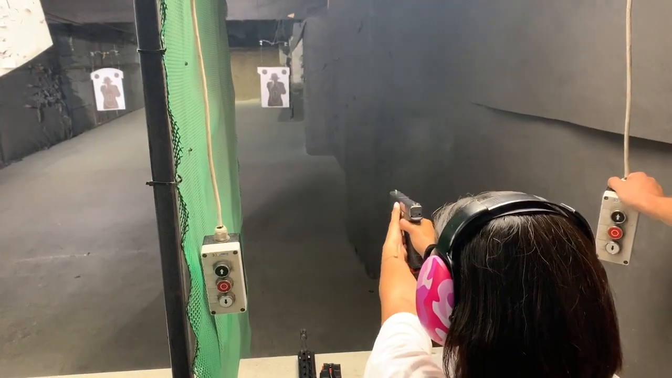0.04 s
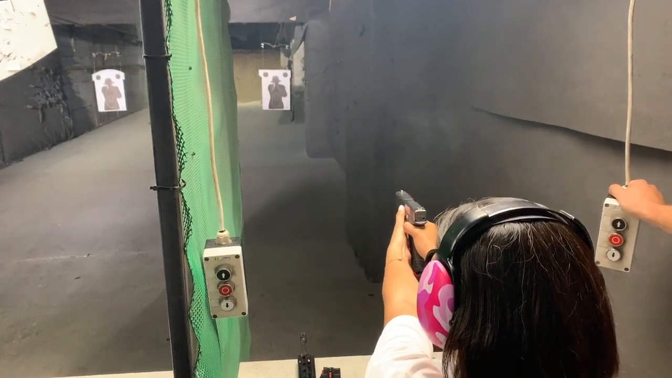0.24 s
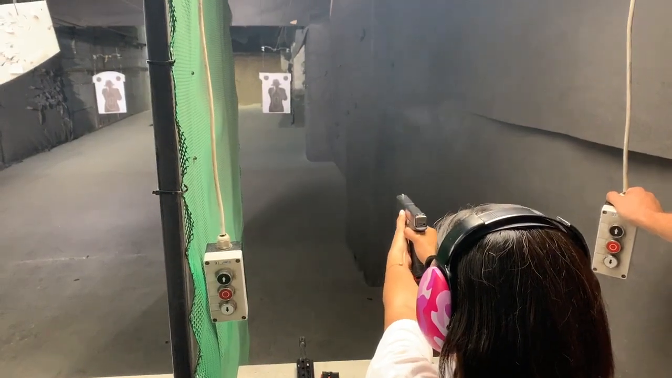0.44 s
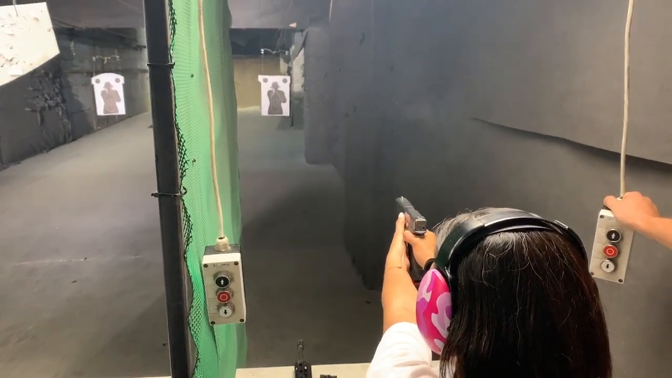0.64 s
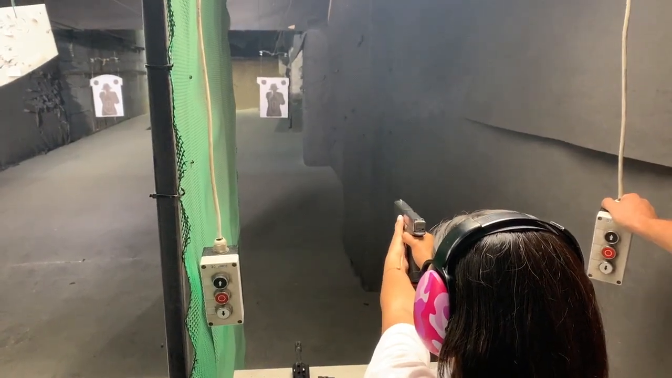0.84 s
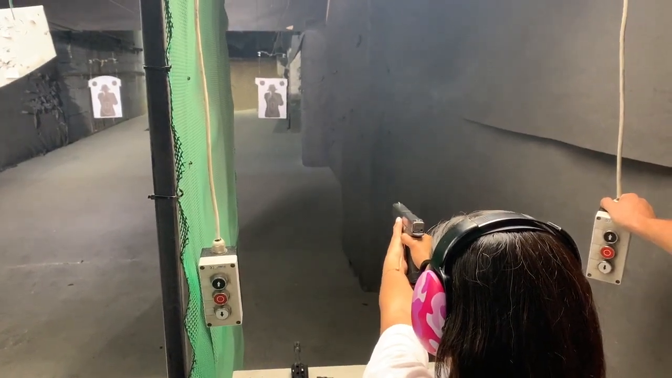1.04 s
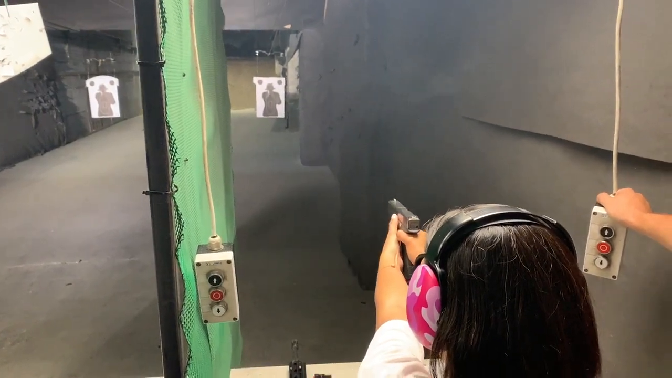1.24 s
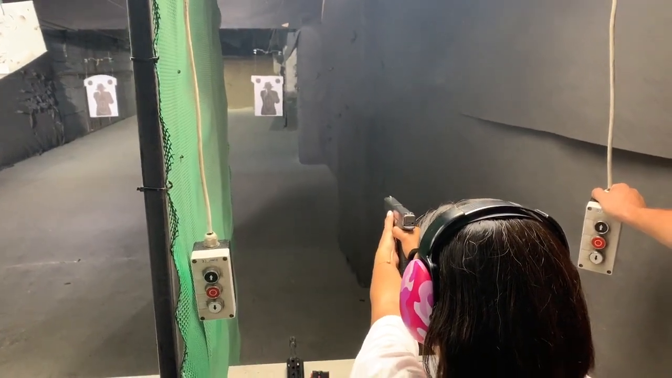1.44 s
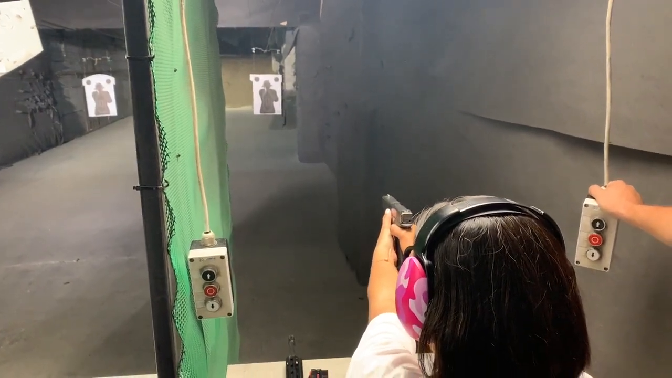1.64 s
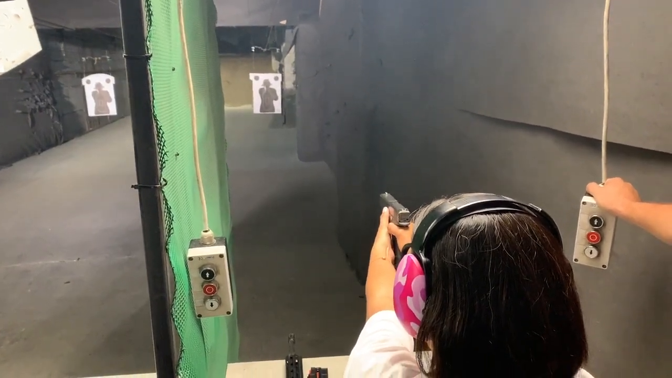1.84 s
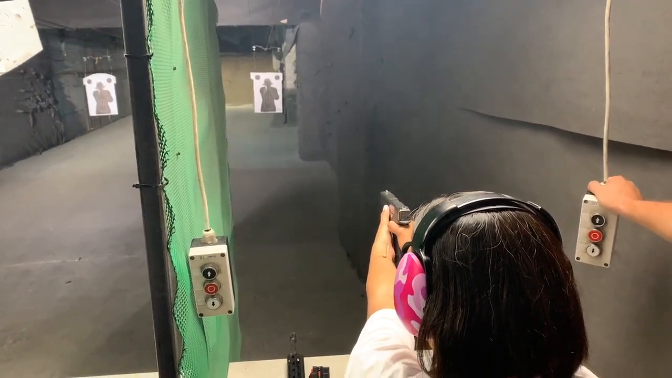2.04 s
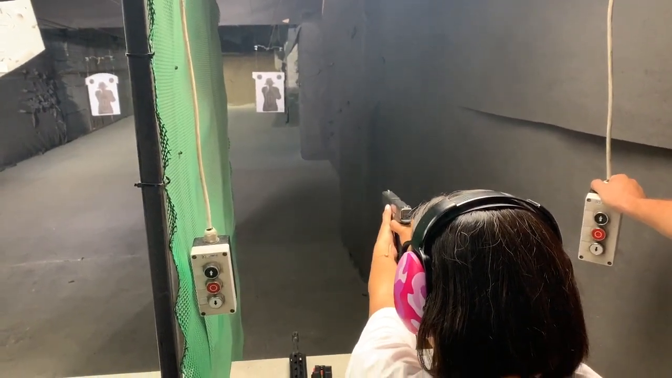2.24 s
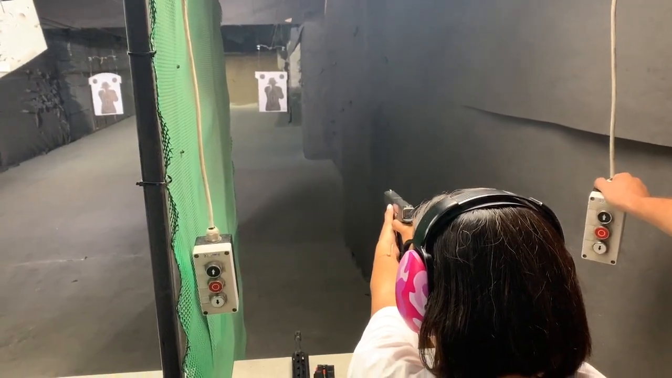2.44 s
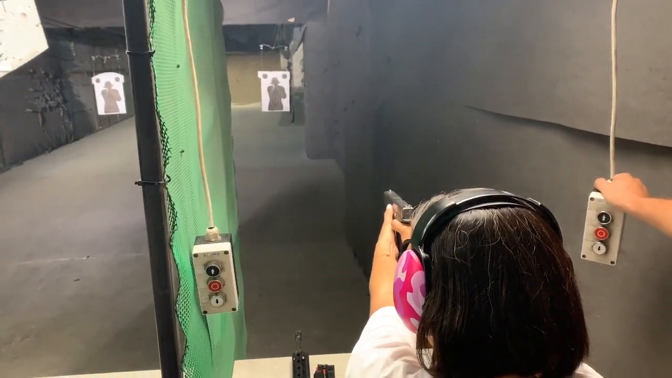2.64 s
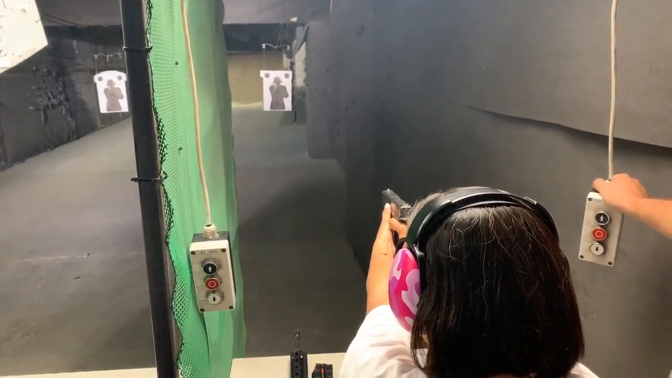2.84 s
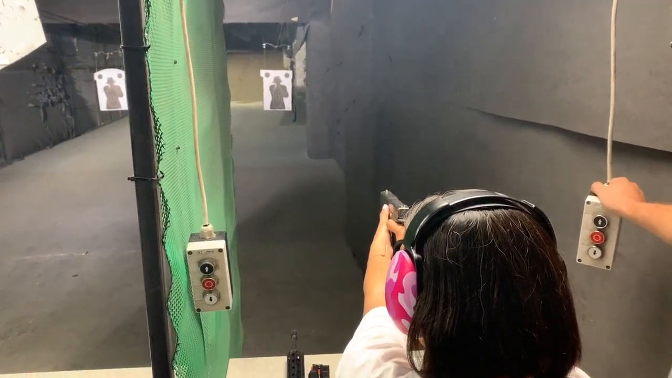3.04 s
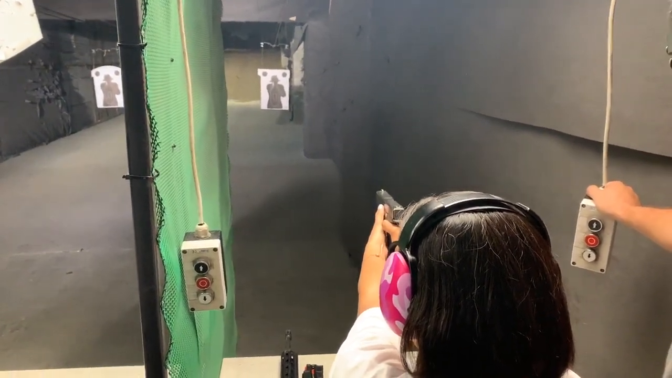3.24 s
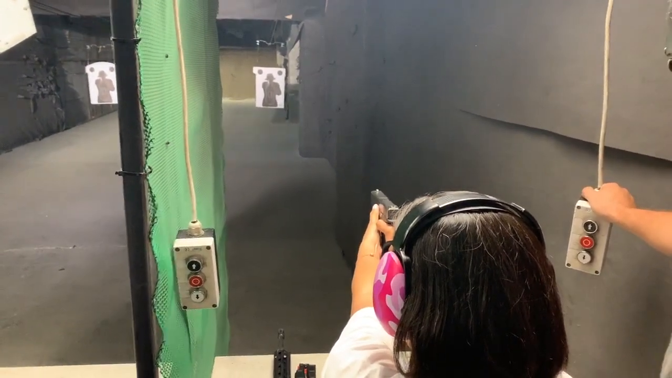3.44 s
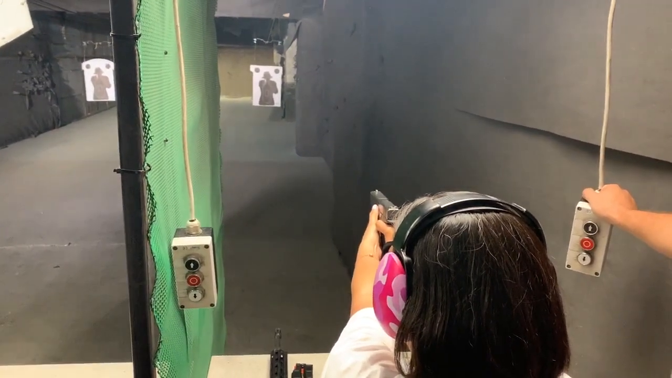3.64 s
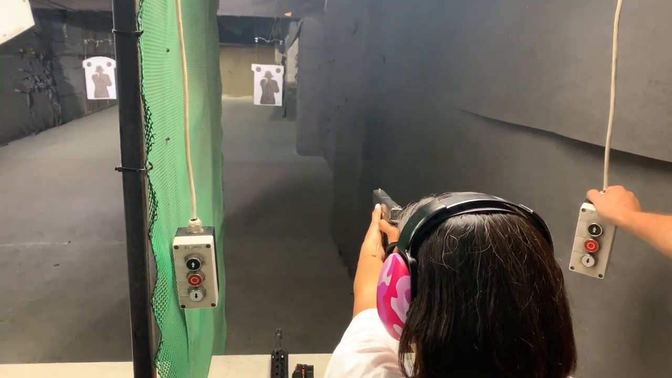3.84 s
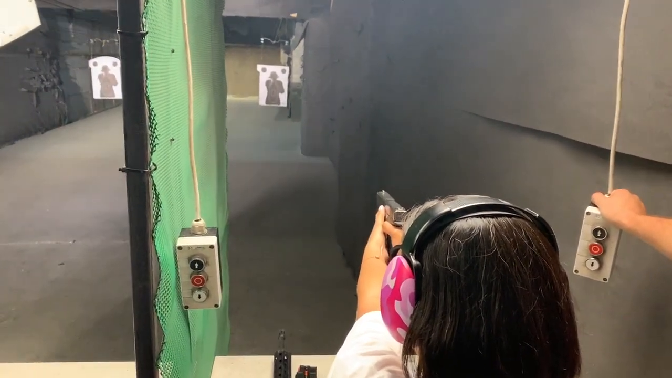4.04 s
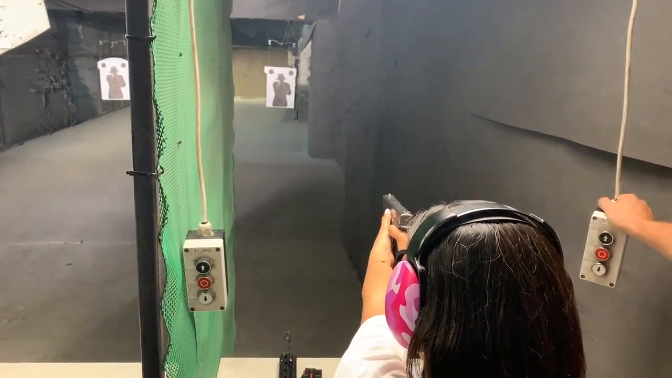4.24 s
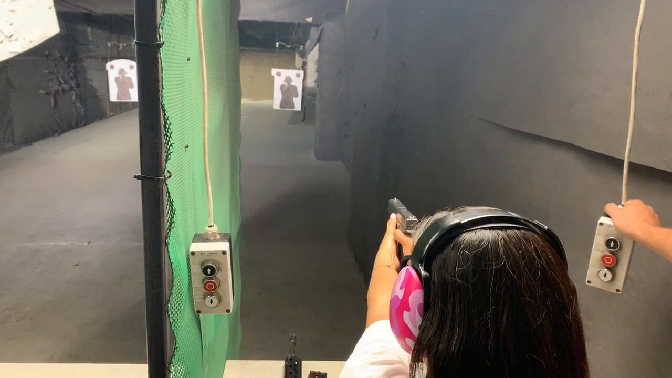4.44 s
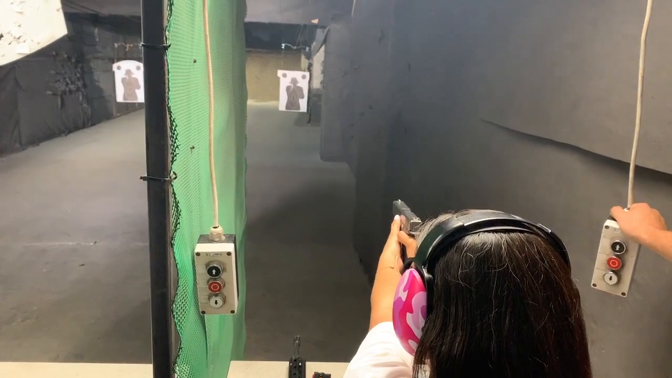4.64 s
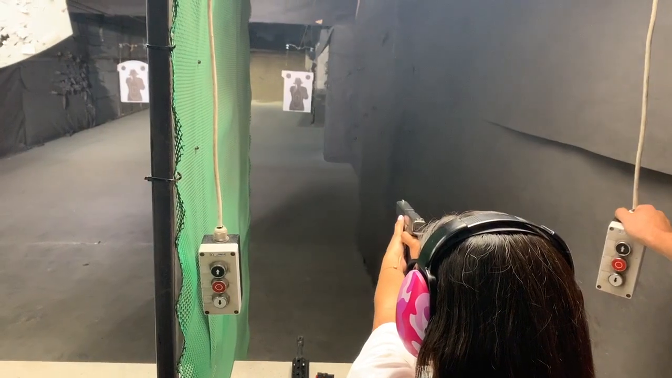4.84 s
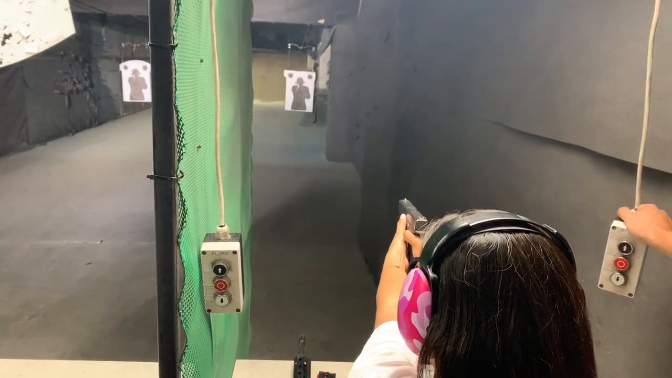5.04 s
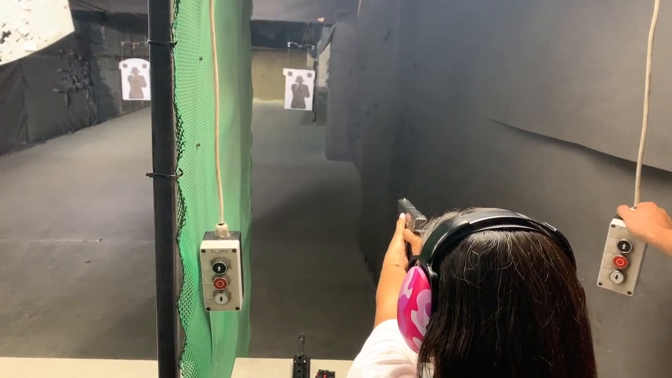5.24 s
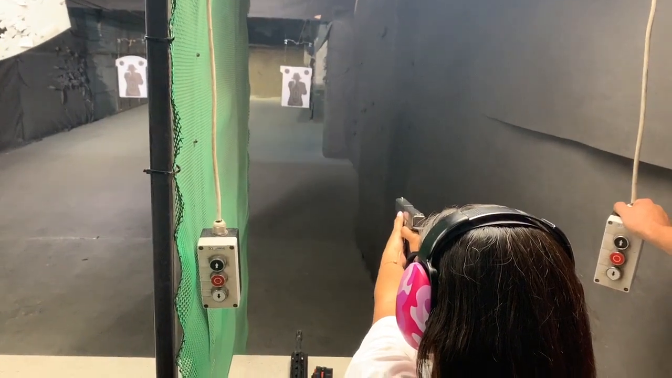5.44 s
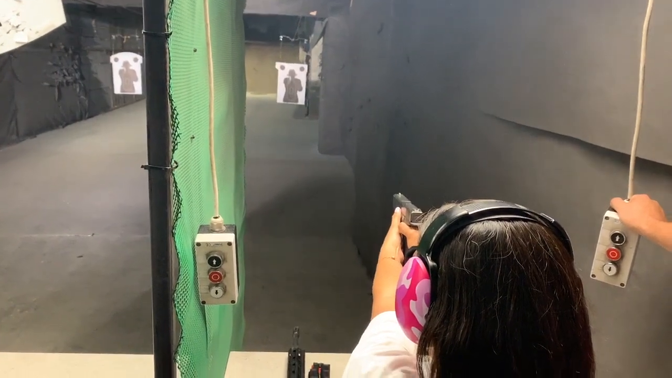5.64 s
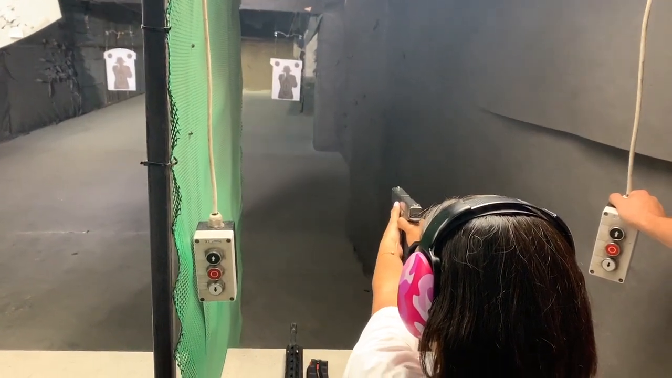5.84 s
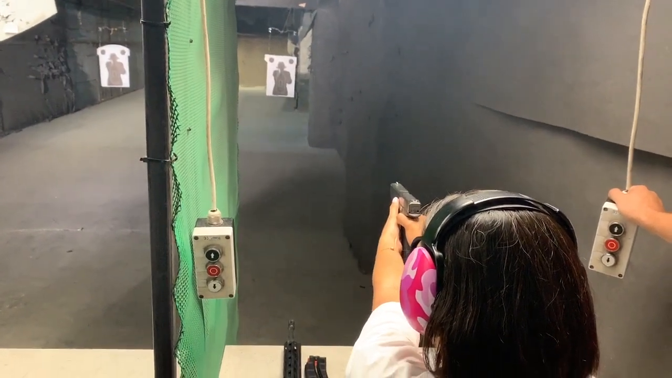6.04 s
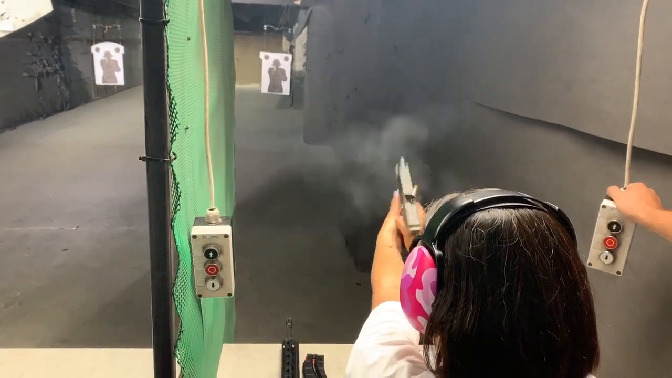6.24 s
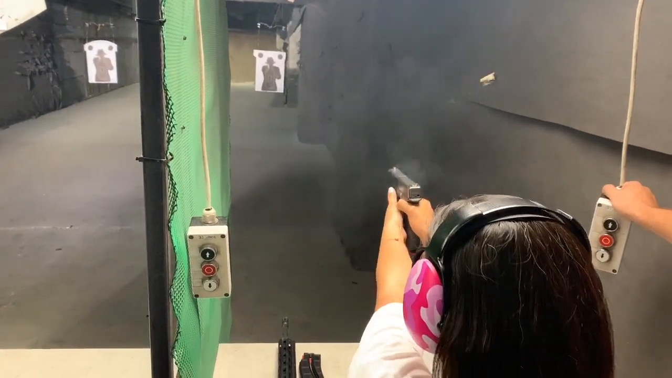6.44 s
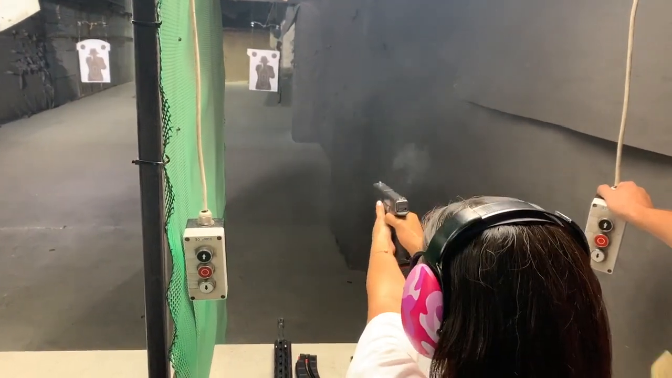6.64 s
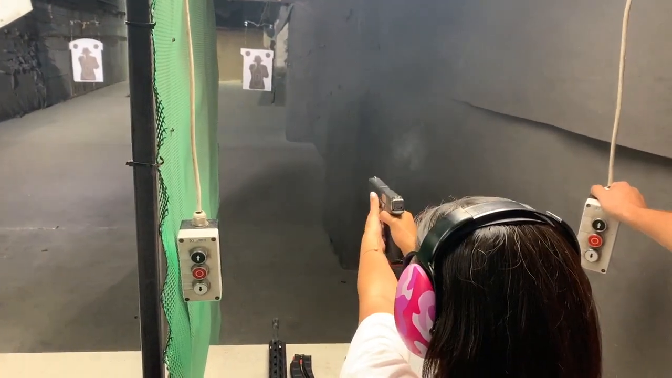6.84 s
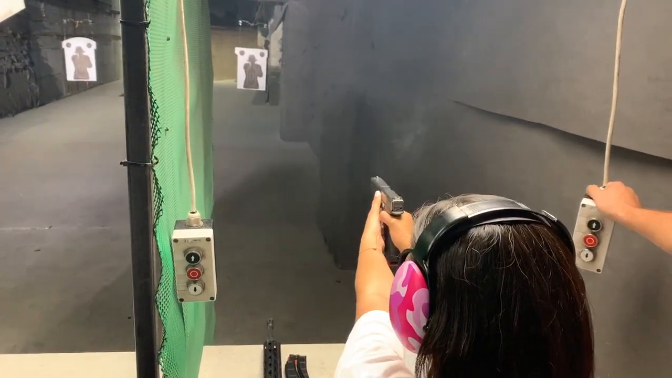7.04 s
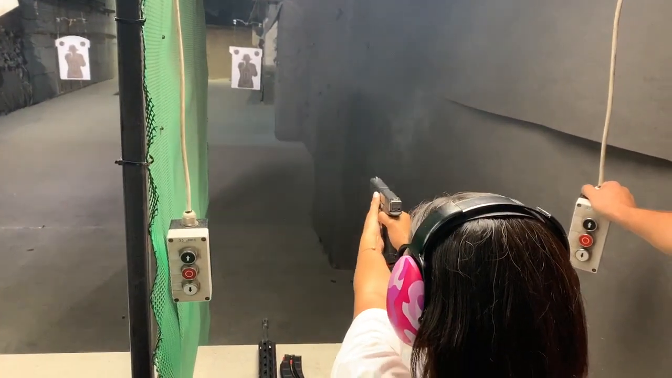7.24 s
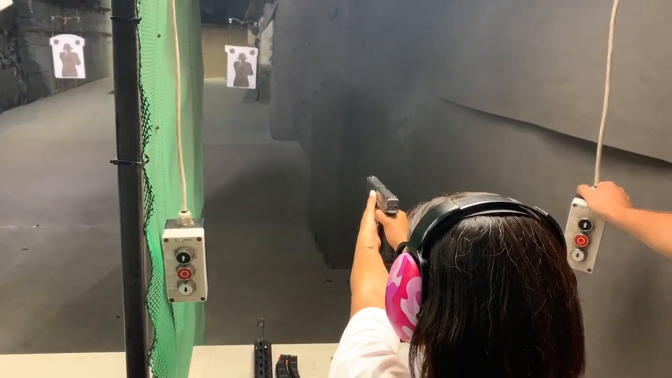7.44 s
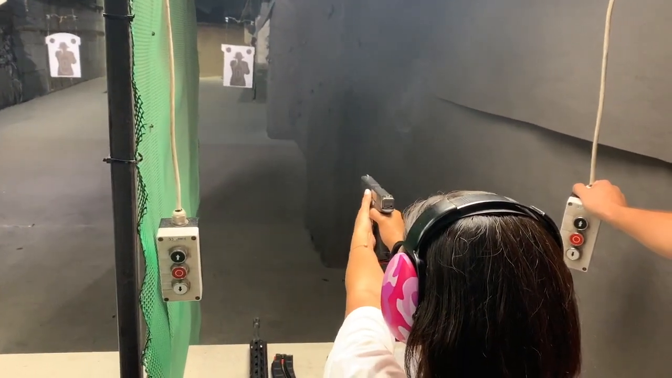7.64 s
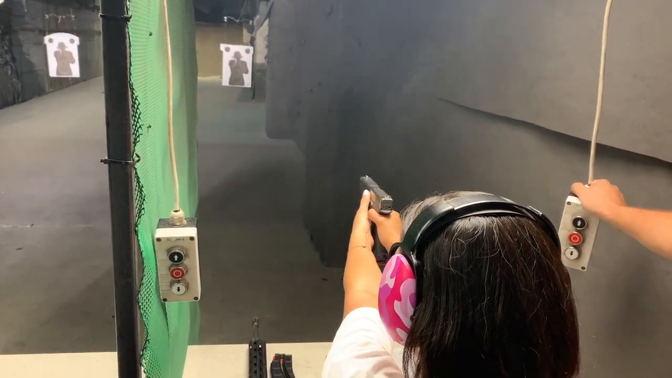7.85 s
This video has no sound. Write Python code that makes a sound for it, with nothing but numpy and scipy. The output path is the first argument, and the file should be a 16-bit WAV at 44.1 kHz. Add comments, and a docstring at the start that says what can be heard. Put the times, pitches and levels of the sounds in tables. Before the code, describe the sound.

Two pistols fire three booming shots in a concrete indoor range, while casings clink faintly over humming ventilation.

```python
"""Two pistols at an indoor range

Two pistols fire single shots from neighbouring booths, close to a stereo microphone. Each blast
rattles round the booth, overloads the microphone, rolls down the concrete lane and comes back from
its far end. Spent brass cases bounce and ring, something clacks once, and the ventilation hums on."""
import sys
import numpy as np
from scipy import signal
from scipy.fft import irfft, next_fast_len
from scipy.io import wavfile

SR = 44100
rng = np.random.default_rng(int(sys.argv[2]) if len(sys.argv) > 2 else 0)


def persist_wave(psi):
    """Save psi, clipped to +-1, as 16-bit WAV."""
    counts = np.round(np.clip(psi, -1, 1) * 32767).astype(np.int16)
    wavfile.write(sys.argv[1], SR, np.atleast_2d(counts).T)


N = 348831

# How alike the microphone's left and right sides sound: f/Hz, likeness from 0 to 1
LIKENESS = [(100, 1), (300, 0.83), (1000, 0.36), (2300, 0.5), (3600, 0), (4900, 0.96), (6500, 0.7),
            (8000, 1), (15000, 0.9)]
# How much louder the left side is: f/Hz, level/dB
BALANCE = [(60, -0.5), (350, -1.37), (800, -2.5), (1500, -1.4), (3000, -0.5)]

# A "colour" says how strong a noise is at each frequency, compared with the others.
# Colours of the ventilation: f/Hz, level/dB
VENT_RUMBLE = [(15, -34), (45, -13.5), (80, -14.5), (112, -2), (165, -10.5), (220, -5.5), (245, -4),
               (330, -11.5), (370, -15.5), (480, -22), (750, -22), (980, -33.5), (1160, -20)]
VENT_HISS = [(1300, -27), (1650, -25), (2100, -31.5), (2700, -39.5), (4500, -36.5), (6000, -46.5),
             (8000, -50), (10000, -62.5), (16000, -68)]
# Faint fan tones: f/Hz, level/dB
FAN_TONES = [(530, -80.5), (737, -80.5), (922, -84)]
# The two notes the ducts drone on: f/Hz, width/Hz, relative level/dB
DUCT_NOTES = [(273, 5, -5), (313.6, 13, -1)]
# How the drone swells and sinks: t/s, level/dB
DRONE_SWELL = [(.9, -56.5), (1.25, -49), (1.6, -53.5), (1.9, -50), (3.6, -52), (4.6, -56), (5.2, -51),
               (5.7, -53), (7.7, -50.5), (7.9, -61)]

# A dry clack and its rebound: t/s, level/dB, rise and fall/s
CLACK_HITS = [(0.7162, -35, 0.0033), (.738, -44, .0015)]
# Colour of the clack: f/Hz, level/dB
CLACK_COLOUR = [(300, -27), (600, -17), (1100, -2.5), (1600, 6.5), (2100, -3.5), (2700, -5), (3400, -13),
                (4400, -8), (6000, -13.5), (9000, -26), (15000, -41)]
# A "mode" is a note that something rings at; "t60" is the time a sound takes to fade by 60 dB.
# Modes of the hollow body that clacks: f/Hz, level/dB, t60/s
CLACK_MODES = [(1020, -10, 0.23), (1510, -12.5, .05), (2040, -2, 0.054), (4300, -10, .03)]

# Bounces of the brass cases: t/s, tick level/dB, scatter level/dB, ring f/Hz, ring level/dB
BOUNCES = [(0.362, -42.5, -72, 10550, -47), (2.746, -45, -25.5, 7400, -54),
           (3.2885, -51, -58.5, 7440, -41.5), (3.633, -56, -75, 7470, -49.5), (3.79, -64, -79, 7470, -61),
           (7.1615, -41, -58, 10900, -41), (7.4243, -47, -50, 7470, -43.5), (7.579, -63, -78, 10840, -42)]
# Colours of a bounce's tick and of its scatter from the walls: f/Hz, level/dB
TICK_COLOUR = [(1500, -26), (2900, -18), (4250, 12), (6000, -5), (11000, -12), (12800, -2), (15000, -1),
               (16000, -12)]
SCATTER_COLOUR = [(1500, -19), (3500, -14.5), (5100, -11), (6000, -1.5), (9000, -6.5), (11300, -2.5),
                  (12500, -14), (13600, -15), (15000, -16), (16000, -8)]
# Modes of a case: multiple of its ring frequency, level/dB, share of its t60
CASE_MODES = [(1, -5, 1), (1.553, -23, 0.41), (2.01, -18, .4)]
# Modes of a metal fitting that one case strikes: f/Hz, level/dB, t60/s
FITTING_MODES = [(4180, -46, 0.43), (5884, -32, 0.28), (6060, -37, 0.5), (6160, -37, 0.27),
                 (6702, -49, 0.58), (9572, -32, 0.12), (14970, -36, 0.17)]

# Colours of the booth's quick echoes and the lane's long ones: f/Hz, level/dB
BOOTH_COLOUR = [(20, -27), (60, -6.5), (200, 0.5), (500, -1.5), (1300, 1.5), (2000, -3.5), (2800, -14),
                (4400, -11.5), (7000, -16.5), (10000, -19.5), (13000, -29.5), (16000, -27)]
LANE_COLOUR = [(20, -23.5), (45, -13.5), (65, -5), (100, -1), (240, -2.5), (450, 1), (1200, 0),
               (1900, -2.5), (2600, -10), (3600, -16), (5500, -15), (8000, -20), (11000, -25),
               (15000, -32.5)]
# How long those echoes last: f/Hz, t60/s
BOOTH_T60 = [(100, .45), (700, 0.49), (2000, 0.39), (6000, 0.46), (15000, 0.17)]
LANE_T60 = [(60, 1.9), (150, 1.6), (400, 1.327), (1200, 1.211), (2500, 1.082), (5000, .92), (8000, 0.73),
            (15000, .5)]
# The lane's deepest modes (standing waves): f/Hz, level/dB, t60/s
BOOM_MODES = [(62, -32.5, 3.5), (130.6, -36, 3)]
# Colours of the blast's low push, the muzzle crack and its bright first echoes: f/Hz, level/dB
THUMP_COLOUR = [(15, -16), (35, -4.5), (60, 0.5), (100, -3.5), (200, -20.5), (600, -57.5)]
CRACK_COLOUR = [(30, -14.5), (150, -4), (1500, 1), (3500, -3.5), (8000, -9.5), (11000, -11.5),
                (16000, -13.5)]
RASP_COLOUR = [(500, -10), (3000, -0.5), (7000, -1.5), (11000, 0.5), (16000, -7)]
# The shots (the first is already fading at the start): t/s, booth, crack level/dB, room level/dB
SHOTS = [(-.53, "own", 11.5, -1), (2.171, "next", 5, 0.5), (6.2163, "own", 9, 0.96),
         (6.611, "next", 8, -0.4)]


def gain_of(db):
    """Turns decibels into a number to multiply by."""
    return 10 ** (np.asarray(db) / 20)


def evened(x):
    """Scales a sound to an average (rms) strength of 1."""
    return x / np.sqrt(np.mean(x ** 2) + 1e-20)


def bell(x, centre, width):
    """A smooth hump of height 1."""
    return np.exp(-.5 * ((x - centre) / width) ** 2)


def read(table, hz):
    """Reads between the rows of a table, with every octave equally wide."""
    f, value = np.transpose(table)
    return np.interp(np.log(hz + 1), np.log(f + 1), value)


def add(mix, s, sound):
    """Mixes a stereo sound in at s seconds, which may lie before the start."""
    start = round(s * SR)
    sound = sound[:, max(-start, 0):]
    part = mix[:, max(start, 0):][:, :sound.shape[1]]
    part += sound[:, :part.shape[1]]


def left_lead(hz, bass_path_m=-.043, treble_path_m=.0447, changeover_hz=1690):
    """How far the left side is ahead, in radians: bass reaches the right first, treble the left."""
    treble_share = hz ** 2 / (hz ** 2 + changeover_hz ** 2)
    extra_path_m = bass_path_m + (treble_path_m - bass_path_m) * treble_share
    skew = 1.3 * bell(hz, centre=3100, width=330)  # one narrow band is further out of step
    return 2 * np.pi * hz * extra_path_m / 343 + skew  # sound travels at 343 m/s


def noise(colour, size):
    """Coloured noise of strength 1, partly alike on the left and right."""
    hz = np.fft.rfftfreq(size, 1 / SR)
    a, b, c, d = rng.standard_normal((4, len(hz)))
    likeness = np.clip(read(LIKENESS, hz), 0, 1)
    left = a + 1j * b
    right = likeness * left + np.sqrt(1 - likeness ** 2) * (c + 1j * d)
    right = right * np.exp(-1j * left_lead(hz)) / gain_of(read(BALANCE, hz))
    return evened(irfft(np.array([left, right]) * gain_of(read(colour, hz)), size))


def reverb(colour, t60_table, size):
    """Countless echoes blur into noise in which each band fades at its own speed."""
    hz, t, bands = signal.stft(noise(colour, size), SR, nperseg=512)
    fade = gain_of(-60 * t / read(t60_table, hz)[:, None])
    return signal.istft(bands * fade, SR, nperseg=512)[1][:, :size]


def waver(rate_hz, size):
    """A random wobble in strength and phase, as complex numbers of average (rms) size 1."""
    hz = np.fft.fftfreq(size, 1 / SR)
    wobble = np.fft.ifft(np.exp(2j * np.pi * rng.random(size)) * bell(hz, 0, rate_hz))
    return wobble / np.sqrt(np.mean(abs(wobble) ** 2))


def ring(modes, flutter, flutter_hz, size):
    """Fading notes; reflections make each one flutter."""
    t, out = np.arange(size) / SR, np.zeros((2, size))
    for hz, db, t60 in modes:
        direct = np.exp(-1j * np.array([[0], [left_lead(hz)]]))
        reflected = flutter * np.array([waver(flutter_hz, size) for _ in range(2)])
        tone = ((direct + reflected) * np.exp(2j * np.pi * hz * t)).imag
        out += gain_of(db - 60 * t / t60) * tone
    return out / np.sqrt(1 + flutter ** 2)


def ventilation(air_db=-56, waver_hz=6):
    """Air rumbles and hisses in the ducts, with a few unsteady fan tones."""
    size = next_fast_len(N)
    t, fan = np.arange(size) / SR, np.zeros(size)
    for hz, db in FAN_TONES:
        tone = (waver(waver_hz, size) * np.exp(2j * np.pi * hz * t)).real
        fan += gain_of(db) * np.sqrt(2) * tone
    air = gain_of(air_db) * noise(VENT_RUMBLE + VENT_HISS, size)
    return (air + fan)[:, :N]


def duct_drone(trim_db=-1):
    """The ducts resonate on two low notes that slowly swell and sink."""
    t = np.arange(N) / SR
    notes = sum(gain_of(db) * waver(width, next_fast_len(N))[:N] * np.exp(2j * np.pi * hz * t)
                for hz, width, db in DUCT_NOTES)
    low_hz = DUCT_NOTES[0][0]
    sides = np.array([[1], [np.exp(-1j * left_lead(low_hz)) / gain_of(read(BALANCE, low_hz))]])
    swell_db = np.interp(t, *np.transpose(DRONE_SWELL))
    return gain_of(trim_db + swell_db) * evened((sides * notes).real)


def clack(echo_db=-16, echo_t60=0.68, run_up_s=.5):
    """Something slides and snaps home; its hollow body rings and the room echoes."""
    out, t = np.zeros((2, N)), np.arange(SR) / SR - run_up_s
    for s, db, width in CLACK_HITS:
        echo = (t > 0) * gain_of(echo_db - 60 * abs(t) / echo_t60)
        add(out, s - run_up_s, gain_of(db) * (bell(t, 0, width) + echo) * noise(CLACK_COLOUR, len(t)))
        add(out, s, gain_of(db) * ring(CLACK_MODES, flutter=2.0, flutter_hz=60, size=SR // 2))
    return out


def brass_cases(tick_s=0.0037, scatter_t60=0.21, ring_cycles=3200, clang_at_s=2.747):
    """Brass ticks on the floor, echoes off the walls and rings as a tube. One case hits a fitting."""
    size = SR // 2
    out, t = np.zeros((2, N)), np.arange(size) / SR
    for s, tick_db, scatter_db, hz, ring_db in BOUNCES:
        add(out, s, gain_of(tick_db) * np.exp(-t / tick_s) * noise(TICK_COLOUR, size))
        add(out, s, gain_of(scatter_db - 60 * t / scatter_t60) * noise(SCATTER_COLOUR, size))
        add(out, s, gain_of(scatter_db - 20) * reverb(SCATTER_COLOUR, LANE_T60, size))  # faint lane echo
        t60 = ring_cycles / hz  # higher rings fade sooner
        modes = [(hz * multiple, ring_db + db, share * t60) for multiple, db, share in CASE_MODES]
        add(out, s, ring(modes, flutter=1.0, flutter_hz=61, size=size))
    add(out, clang_at_s, ring(FITTING_MODES, flutter=0.83, flutter_hz=70, size=size))
    return out


def room_answer(booth_db, lane_db, thump_db, boom_db, slap_db, far_s, far_width_s, far_db,
                build_s=0.053, thump_t60=0.56):
    """What follows a blast: a low push, echoes in the booth, and the lane filling up and booming."""
    t = np.arange(2 * SR) / SR
    booth = gain_of(booth_db) * reverb(BOOTH_COLOUR, BOOTH_T60, len(t))
    lane = gain_of(lane_db) * reverb(LANE_COLOUR, LANE_T60, len(t)) * (1 - np.exp(-t / build_s))
    swell_db = slap_db * bell(t, centre=0.063, width=0.0043)  # a wall slaps back
    swell_db += 2.5 * bell(t, centre=0.056, width=.024)  # floor and ceiling echoes bunch up
    swell_db += far_db * bell(t, far_s, far_width_s)  # the far end answers
    thump = gain_of(thump_db - 60 * t / thump_t60) * noise(THUMP_COLOUR, len(t))
    boom = gain_of(boom_db) * ring(BOOM_MODES, flutter=0.89, flutter_hz=4, size=len(t))
    return (booth + lane) * gain_of(swell_db) + thump + boom


def pistol_shot(room, crack_db, room_db, crack_s=0.0036, rasp_db=-23, rasp_s=0.056):
    """A fresh muzzle crack and its rasp off the nearest walls, plus the room's unchanging answer."""
    t = np.arange(room.shape[1]) / SR
    crack = np.exp(-t / crack_s) * noise(CRACK_COLOUR, len(t))
    rasp = gain_of(rasp_db) * bell(t, 0, rasp_s) * noise(RASP_COLOUR, len(t))
    return gain_of(crack_db) * (crack + rasp) + gain_of(room_db) * room


def scene():
    """Ventilation, clack and brass, with shots from the microphone's own booth and the next one."""
    mix = ventilation() + duct_drone() + brass_cases() + clack()
    rooms = {
        "next": room_answer(booth_db=1, lane_db=-6, thump_db=-31.5, boom_db=-6, slap_db=1.5,
                            far_s=0.32, far_width_s=0.061, far_db=3),
        "own": room_answer(booth_db=-0.7, lane_db=-5.5, thump_db=-11.5, boom_db=1, slap_db=4,
                           far_s=.36, far_width_s=0.045, far_db=6.5)}
    for s, booth, crack_db, room_db in SHOTS:
        add(mix, s, pistol_shot(rooms[booth], crack_db, room_db))
    return mix


def record(dry):
    """The blasts overload the microphone, which flattens their peaks; the highest treble is cut."""
    clipped = dry / (1 + dry ** 8) ** (1 / 8)
    low_pass = signal.firwin(511, cutoff=16100, window=("kaiser", 9), fs=SR)
    return signal.oaconvolve(clipped, low_pass[None], "same")


dry = scene()
out = record(dry)
persist_wave(out)
```